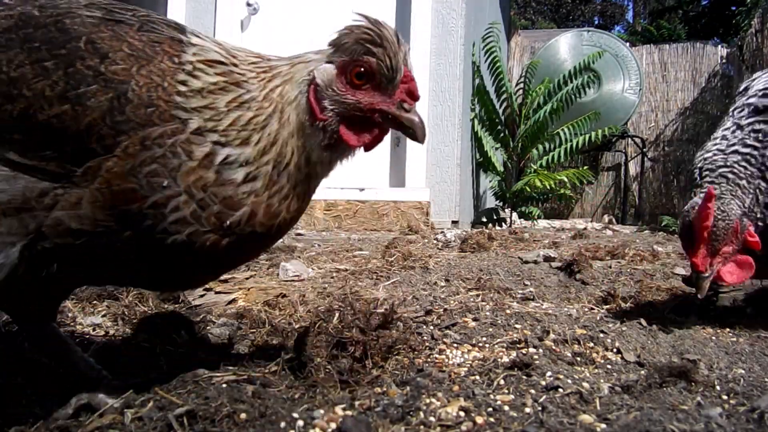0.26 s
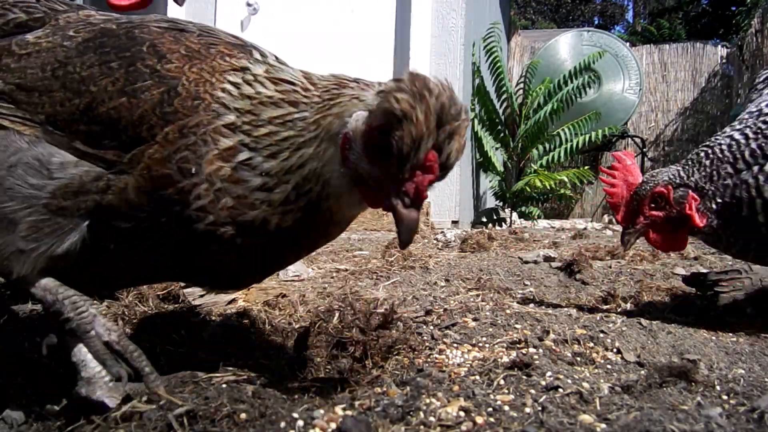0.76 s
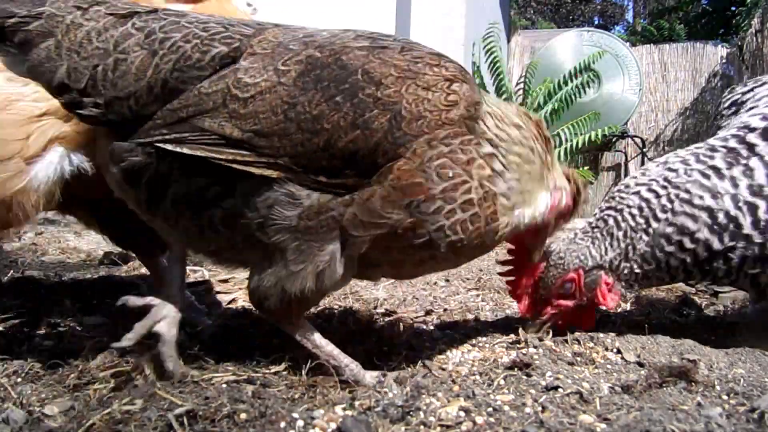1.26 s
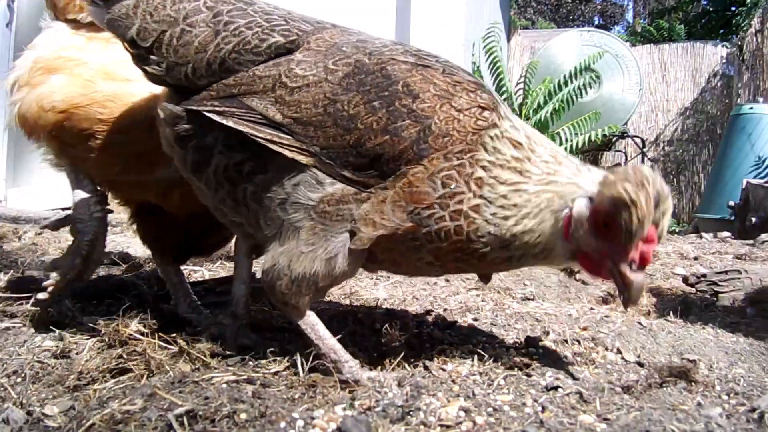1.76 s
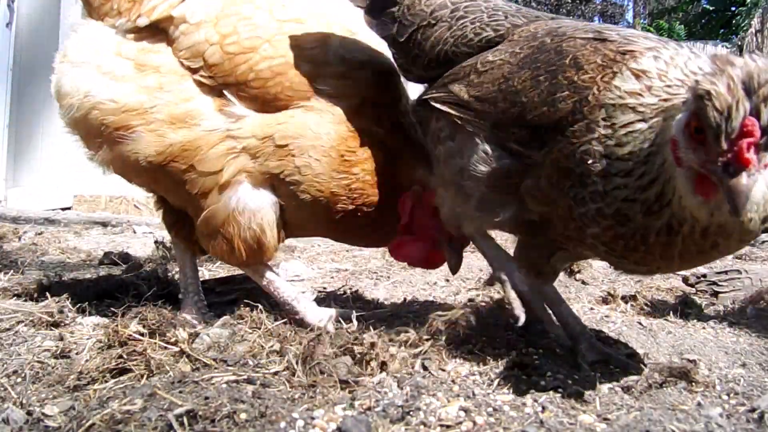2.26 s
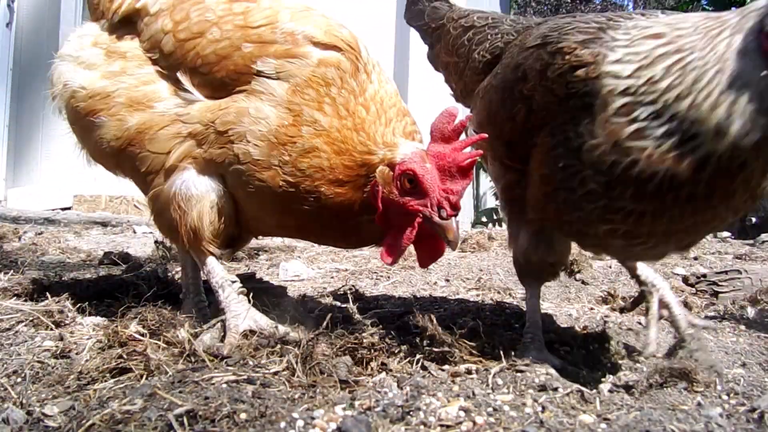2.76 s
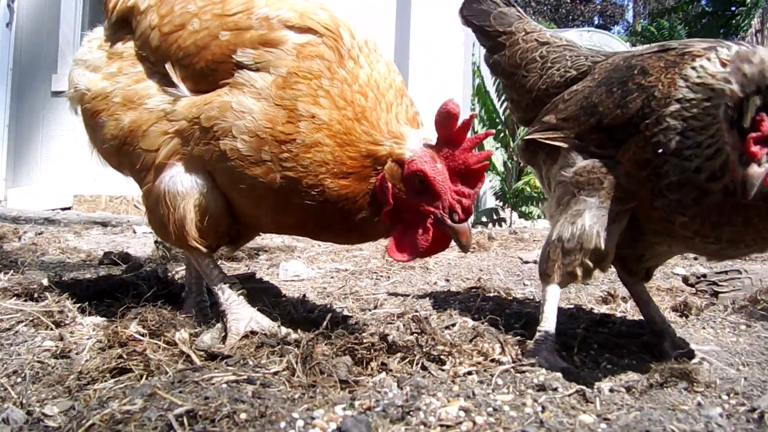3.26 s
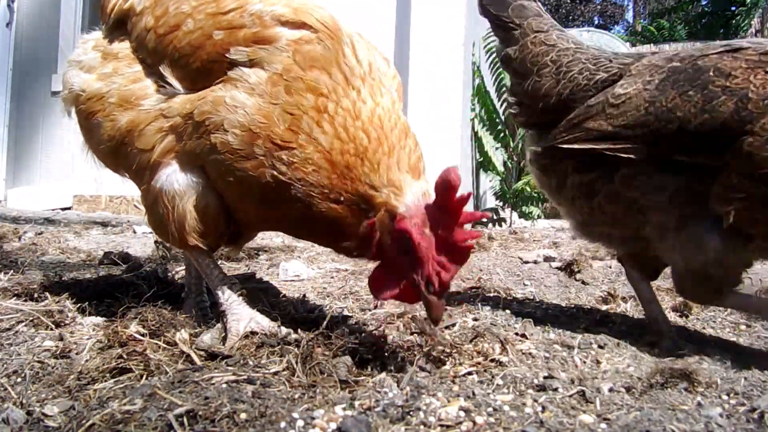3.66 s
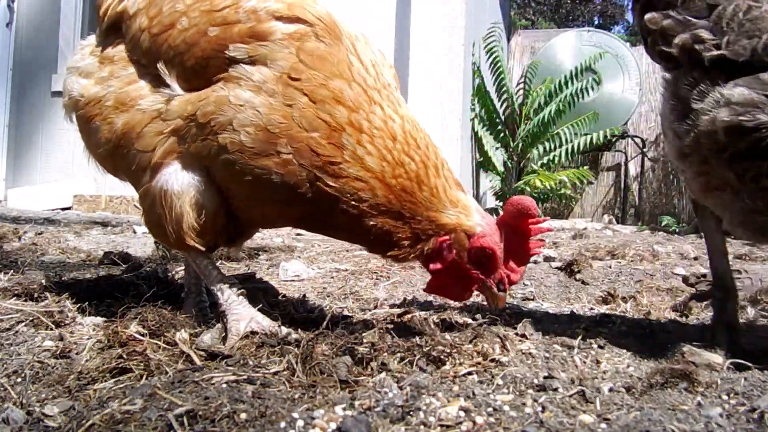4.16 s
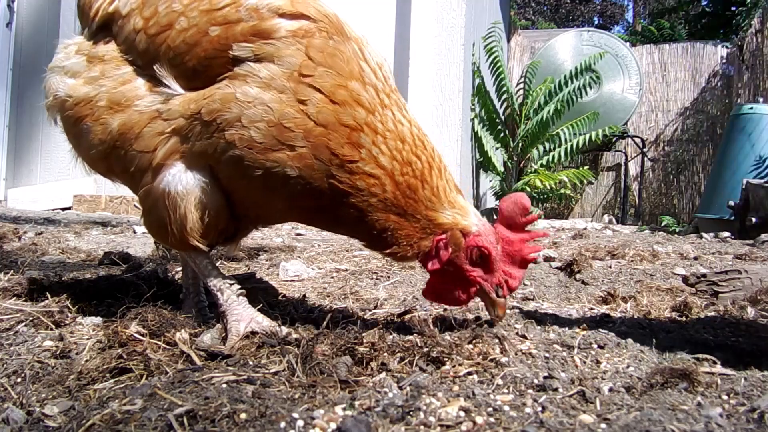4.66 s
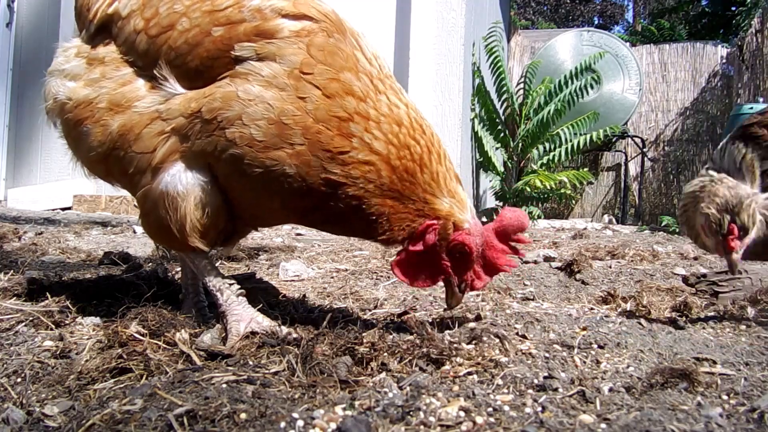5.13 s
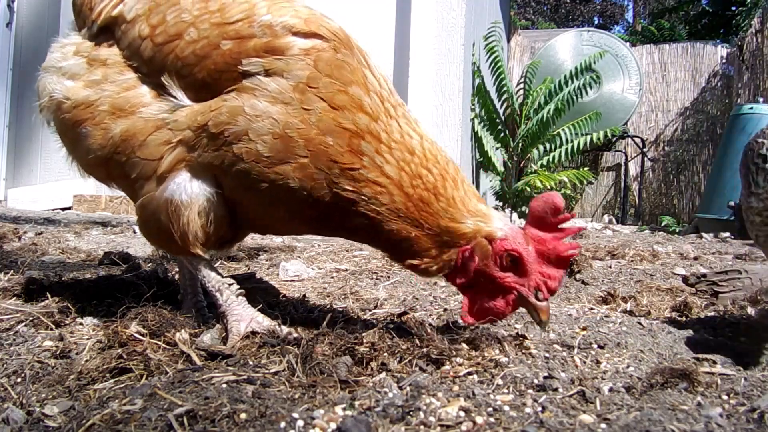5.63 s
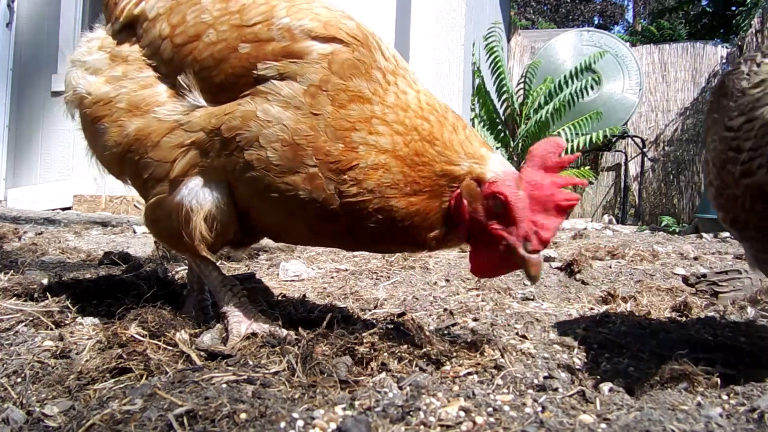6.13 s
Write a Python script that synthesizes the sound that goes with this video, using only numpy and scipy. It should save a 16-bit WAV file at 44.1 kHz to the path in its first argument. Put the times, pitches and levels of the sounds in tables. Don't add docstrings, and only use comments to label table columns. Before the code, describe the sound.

Hens scratch and peck seed from dry dirt with sharp ticks and knocks, give short clucks and one brief squawk, then murmur softly.

```python
import sys
import numpy as np
from scipy import signal
from scipy.fft import rfft, irfft
from scipy.io import wavfile

SR = 44100
rng = np.random.default_rng(int(sys.argv[2]) if len(sys.argv) > 2 else 0)


def voltage_ratio(level):
    return 10 ** (np.asarray(level, float) / 20)


def bounce(signal):
    frames = np.transpose(np.atleast_2d(signal))
    limited = np.clip(frames, -1, 1)
    pcm = np.round(limited * 32767).astype(np.int16)
    wavfile.write(sys.argv[1], SR, pcm)


N = 281799
T = np.arange(N) / SR

# (frequency [Hz], density [dB per Hz])
YARD_SPECTRUM = [(25, -102), (60, -95), (150, -83.5), (600, -85.5), (1150, -85), (1600, -85), (2200, -93),
                 (3000, -97), (4300, -99), (6000, -103), (9000, -112), (16000, -125)]
# (frequency [Hz], level [dB], wander [dB])
HUM_TONES = [(73, -76, 4.5), (118.4, -64.5, 5)]
# (time [s], rustle level [dB], fine dry part re rustle [dB])
RUSTLE_TRACK = [(0.0, -62, 10), (0.12, -65, 7), (0.19, -46.5, -8), (0.32, -61, -3), (0.6, -78, -5),
                (0.67, -53, -13), (0.76, -74, -5), (0.8, -50.5, 2), (0.93, -69, 11), (1.12, -54, 7),
                (1.14, -41, -1), (1.19, -53, 8), (1.24, -48, -1), (1.26, -65, 13), (1.33, -44, -4),
                (1.42, -59, 7), (1.46, -49, -7), (1.47, -51, -1), (1.65, -47.5, 0), (1.78, -58, 4),
                (2.13, -51.5, -20), (2.21, -58, -4), (2.22, -46, 5), (2.31, -56, -8), (2.35, -47, -30),
                (2.4, -53, -17), (2.47, -73, -9), (2.51, -29, -29), (2.53, -61, -11), (2.58, -70.5, -12),
                (2.7, -49.5, -5), (2.9, -48, -4), (3.13, -58.5, -9), (3.24, -56, -33), (3.44, -80, -12),
                (3.7, -66, -21), (4.61, -81, -17), (4.64, -61, -11), (4.66, -79, -9), (4.86, -71.5, -19.5),
                (6.39, -62.5, -1)]
# (time [s], peak [dB], centre [Hz])
STRAW_SNAPS = [(0.141, -54, 5980), (0.19, -44, 5400), (0.2109, -49, 9770), (0.3476, -45, 6290),
               (0.4168, -51, 5900), (0.5806, -50, 5780), (0.789, -52, 9700), (0.8545, -48, 5570),
               (0.9564, -45, 9700), (1.1066, -45, 5700), (1.233, -43, 5580), (1.335, -48, 6220),
               (1.4513, -37, 5500), (1.5229, -54, 5910), (1.5755, -37.5, 5800), (1.6262, -48, 5570),
               (1.6521, -51, 5810), (1.729, -46.5, 5600), (1.8203, -56, 5600), (1.9732, -47, 5740),
               (2.2258, -41, 5500), (2.495, -52, 5700), (2.709, -52, 9500), (2.7805, -48, 5730),
               (3.8596, -53, 5640), (4.6399, -47, 5770), (5.444, -54, 5720)]
# (time [s], peak [dB], ring [Hz], t60 [s])
BEAK_KNOCKS = [(0.185, -45, 1460, 0.015), (0.215, -44.5, 1160, 0.015), (0.264, -48, 813, 0.015),
               (0.64, -42.5, 970, 0.015), (0.72, -44, 1590, 0.012), (0.857, -45.5, 945, 0.015),
               (1.245, -48, 890, 0.017), (1.549, -48, 729, 0.015), (1.626, -36.5, 1910, 0.011),
               (1.702, -38, 830, 0.018), (1.821, -45, 1550, 0.022), (1.903, -38, 900, 0.017),
               (2.226, -44, 1680, 0.014), (2.546, -40, 1010, 0.012), (3.158, -42.5, 940, 0.012),
               (4.451, -34.5, 805, 0.016), (4.64, -29.5, 1500, 0.011), (4.819, -44, 1430, 0.015),
               (4.865, -38, 700, 0.017), (5.591, -42, 1470, 0.017), (5.95, -45, 1130, 0.017),
               (5.977, -40, 1300, 0.019)]
# (time [s], peak [dB], ring [Hz], t60 [s])
SEED_TICKS = [(0.186, -39, 4100, 0.014), (0.19, -39, 4300, 0.011), (0.217, -28.5, 3680, 0.0094),
              (0.2564, -48, 4380, 0.015), (0.2648, -43, 4300, 0.013), (0.3546, -44.5, 4130, 0.015),
              (0.3995, -49, 4200, 0.015), (0.5801, -53, 4010, 0.015), (0.64, -43, 4170, 0.015),
              (0.6653, -41, 4000, 0.017), (0.7193, -44, 3860, 0.015), (0.7915, -32.5, 4160, 0.022),
              (0.8255, -40, 4160, 0.017), (0.832, -40, 4040, 0.019), (0.855, -45, 4230, 0.015),
              (0.8774, -50, 4300, 0.015), (0.9592, -54, 4440, 0.015), (1.1034, -49, 4120, 0.015),
              (1.1333, -44, 4310, 0.015), (1.2343, -25, 4160, 0.021), (1.286, -52, 4170, 0.015),
              (1.3089, -50, 4280, 0.015), (1.4514, -21, 3990, 0.008), (1.476, -43, 3230, 0.015),
              (1.5459, -42, 4200, 0.018), (1.5765, -33.5, 4310, 0.011), (1.6274, -42, 4250, 0.015),
              (1.6526, -41, 3900, 0.015), (1.701, -40.5, 4390, 0.015), (1.8228, -49, 4100, 0.015),
              (1.8813, -44, 3510, 0.016), (1.9024, -57, 4470, 0.015), (1.9714, -53, 4070, 0.015),
              (2.227, -33.5, 4630, 0.015), (2.5466, -46, 4190, 0.015), (2.7082, -46, 3920, 0.015),
              (2.781, -49, 4370, 0.015), (2.8689, -52, 4280, 0.016), (3.0115, -43, 4000, 0.015),
              (3.1575, -39, 3800, 0.013), (3.1674, -46, 4190, 0.014), (3.386, -49.5, 4230, 0.015),
              (3.782, -46, 4050, 0.015), (3.8576, -46, 3800, 0.015), (3.927, -49, 4350, 0.013),
              (4.3799, -55, 4430, 0.015), (4.4416, -43, 4140, 0.015), (4.4514, -52, 4270, 0.015),
              (4.6254, -51, 4260, 0.015), (4.6399, -33, 4050, 0.0083), (4.8184, -41.5, 4150, 0.015),
              (4.864, -43.5, 4060, 0.014), (5.1916, -48, 3140, 0.015), (5.4435, -48, 2960, 0.015),
              (5.5907, -39, 4300, 0.012), (5.6745, -49, 3270, 0.015), (5.7508, -48.5, 4290, 0.015),
              (5.9499, -46, 4350, 0.015), (5.975, -40.5, 3080, 0.015), (6.1629, -46, 4400, 0.014)]
# (time [s], pitch [Hz], level [dB])
SPARROW_NOTES = [
    [(1.98, 3200, -66), (2.0, 3130, -60), (2.025, 3130, -62)],
    [(2.025, 3510, -66), (2.042, 3800, -58), (2.056, 3500, -53), (2.068, 3280, -56), (2.095, 3200, -62)],
    [(3.204, 3200, -54), (3.21, 3700, -49), (3.217, 4390, -54), (3.238, 4450, -51), (3.252, 4230, -60),
     (3.266, 4100, -63)],
    [(3.238, 3480, -60), (3.243, 3230, -49), (3.25, 3650, -42.5), (3.258, 3700, -59)],
    [(3.258, 2910, -58), (3.275, 3100, -54), (3.287, 3484, -38.5), (3.294, 2830, -54), (3.31, 2700, -61),
     (3.337, 2800, -65)],
    [(3.272, 4220, -64), (3.28, 4250, -54), (3.292, 4220, -64)],
]
# (time [s], peak [dB], throat [Hz], sharp edge re peak [dB])
THROAT_POPS = [(2.0962, -26, 864, -35), (2.3353, -35, 700, -40), (2.3396, -22, 740, -20),
               (2.3453, -26, 730, -7.5), (2.4923, -25, 845, -43), (2.4962, -21, 800, -14.5),
               (2.733, -34, 1430, -21), (2.7367, -23, 820, -38), (2.7398, -18, 786, -41),
               (3.7202, -27, 1000, -40), (3.7239, -26, 970, -33), (4.1282, -34, 890, -34),
               (4.1322, -27, 960, -35)]
# (time [s], pitch [Hz], first partial [dB], second partial [dB])
CLUCK_TRACKS = [
    [(2.1, 745, -41.5, -55), (2.144, 727, -32.5, -40), (2.17, 710, -51, -75)],
    [(2.348, 656, -37, -39), (2.388, 684, -30, -48), (2.41, 687, -51, -69)],
    [(2.499, 636, -33, -28.5), (2.515, 708, -23.5, -50.5), (2.532, 637, -60, -79)],
    [(2.744, 577, -42, -47), (2.758, 570, -36, -41), (2.778, 577, -60, -68)],
    [(3.727, 628, -50, -45), (3.743, 732, -37.5, -50.5), (3.793, 665, -41, -46.5), (3.824, 670, -54, -70)],
    [(3.96, 795, -47.5, -54), (3.976, 718, -33, -43.5), (4.04, 687, -47, -66)],
    [(4.13, 654, -48, -31), (4.144, 627, -36.5, -48), (4.163, 740, -63, -51)],
]
# (time [s], pitch [Hz], level [dB], throat [Hz], fall above throat [dB per octave])
SQUAWK_TRACKS = [
    [(2.799, 322, -34.5, 820, -7), (2.815, 280.6, -18, 870, -5), (2.88, 252, -32, 820, -13.5)],
    [(2.88, 231, -29, 820, -7), (2.948, 225, -23, 856, -14), (2.966, 204, -36.5, 830, -9),
     (2.978, 198, -46, 820, -7)],
]
# (time [s], pitch [Hz], first partial [dB], second partial [dB])
MURMUR_TRACKS = [
    [(4.08, 390.4, -73, -63), (4.104, 348.5, -55, -51.5), (4.186, 354.7, -68, -57.5),
     (4.23, 340.4, -61.5, -60.5), (4.33, 338, -61, -53)],
    [(4.33, 402.5, -56, -56), (4.402, 341, -69, -62.5), (4.518, 393.6, -52.5, -50), (4.544, 321, -60, -52),
     (4.57, 362.6, -74, -88)],
    [(4.6, 314.5, -59.5, -60), (4.746, 345, -51, -47), (4.772, 389, -49.5, -61), (4.794, 329, -49, -42),
     (4.82, 340, -63, -65)],
    [(4.835, 339, -64, -66), (4.865, 325, -45, -48), (4.905, 325, -60, -60)],
    [(4.945, 330, -66, -69), (4.981, 314.6, -49.5, -53), (5.015, 278, -59, -49)],
    [(5.04, 365, -69, -69), (5.076, 342, -40, -41), (5.115, 331, -64, -63)],
]
# (frequency [Hz], density [dB per Hz])
HISS_SPECTRUM = [(100, -100), (1000, -100), (3000, -106), (7000, -112), (9000, -105), (16000, -101)]
# (frequency [Hz], width [Hz])
CASE_NOTCHES = [(2500, 300), (5020, 1110), (7500, 910)]


def rms_one(x):
    return x / np.sqrt(np.mean(x ** 2) + 1e-20)


def span(rows):
    s, *columns = np.transpose(rows)
    part = slice(int(s[0] * SR), int(s[-1] * SR))
    t = T[part]
    fade = np.clip(np.minimum(t - s[0], s[-1] - t) / 0.0013, 0, 1)
    return part, [np.interp(t, s, c) for c in columns], fade


def drift(rate_hz):
    r = np.exp(-80 * np.pi * rate_hz / SR)
    noise = rng.standard_normal(N // 40 + 2002)
    slow = signal.lfilter([1], [1, -2 * r, r * r], noise)[2000:]
    return np.interp(np.arange(N) / 40, np.arange(len(slow)), rms_one(slow))


def coloured(spectrum, count):
    hz = np.maximum(np.fft.rfftfreq(N, 1 / SR), 1)
    points_hz, points_db = np.transpose(spectrum)
    density_db = np.interp(np.log(hz), np.log(points_hz), points_db)
    gain = voltage_ratio(density_db) * np.sqrt(SR / 2)
    return irfft(rfft(rng.standard_normal((count, N))) * gain, N)


def add_ring(out, s, db, hz, t60):
    t = np.arange(int(np.clip(t60, 0.001, 0.2) * SR)) / SR
    ring = -voltage_ratio(db - 60 * t / t60) * np.sin(2 * np.pi * hz * t)
    at = int(s * SR)
    out[at:at + len(t)] += ring[:N - at]


def peak(x, hz, width_hz):
    r = np.exp(-np.pi * width_hz / SR)
    poles = [1, -2 * r * np.cos(2 * np.pi * hz / SR), r * r]
    return signal.lfilter([(1 - r * r) / 2, 0, (r * r - 1) / 2], poles, x)


def yard(alike, gust_db):
    shared, left, right = coloured(YARD_SPECTRUM, count=3)
    own = np.array([left, right])
    air = np.sqrt(alike) * shared + np.sqrt(1 - alike) * own
    return air * voltage_ratio(gust_db * drift(3))


def hum():
    out = np.zeros(N)
    for hz, db, wander_db in HUM_TONES:
        level = voltage_ratio(db + wander_db * drift(4.2))
        out += np.sqrt(2) * level * np.sin(2 * np.pi * hz * T)
    return out


def rustle():
    part, (level_db, fine_db), _ = span(RUSTLE_TRACK)
    sizes = voltage_ratio(3.4 * np.minimum(rng.exponential(1, N), 5)) * rng.choice([-1, 1], N)
    grains_per_s = 2500 * voltage_ratio(5 * drift(25))
    grains = sizes * (rng.random(N) < grains_per_s / SR) + 1e-18
    dealt = rng.integers(0, 16, N)
    rings = []
    for k, hz in enumerate(np.geomspace(1500, 11000, 16)):
        rings.append(peak(grains * (dealt == k), hz, hz / 5.8))
    coarse = rms_one(sum(rings[:10]))[part]
    fine = rms_one(sum(rings[10:]))[part]
    out = np.zeros(N)
    out[part] = voltage_ratio(level_db - 4.5) * (coarse + voltage_ratio(fine_db - 8.5) * fine)
    return out


def straw_snaps():
    out = np.zeros(N)
    for s, db, hz in STRAW_SNAPS:
        add_ring(out, s, db + 12.5, hz, t60=0.003)
    return out


def beak_knocks():
    out = np.zeros(N)
    for s, db, hz, t60 in BEAK_KNOCKS:
        add_ring(out, s, db + 5.5, hz, t60)
        add_ring(out, s, db - 2, hz * 1.67, t60 * 0.73)
    return out


def seed_ticks():
    out = np.zeros(N)
    chances = rng.random((len(SEED_TICKS), 2))
    for (s, db, hz, t60), (wait, detune) in zip(SEED_TICKS, chances):
        add_ring(out, s, db - 1.5, hz, t60)
        rebound_s = s + 0.00099 + 0.0052 * wait
        add_ring(out, rebound_s, db - 5, hz * (0.77 + 0.3 * detune), t60=0.005)
    return out


def sparrow():
    out = np.zeros(N)
    for rows in SPARROW_NOTES:
        part, (hz, level_db), fade = span(rows)
        turn = 2 * np.pi * np.cumsum(hz) / SR
        out[part] += np.sqrt(2) * voltage_ratio(level_db) * fade * np.sin(turn)
    t = np.arange(int(0.12 * SR)) / SR
    decay = rng.standard_normal(len(t)) * voltage_ratio(-60 * t / 0.24)
    echoes = rms_one(decay) / np.sqrt(len(t))
    return out + voltage_ratio(-3) * signal.fftconvolve(out, echoes)[:N]


def throat_pops():
    out = np.zeros(N)
    for s, db, throat_hz, edge_db in THROAT_POPS:
        add_ring(out, s, db, throat_hz, t60=0.014)
        add_ring(out, s, db + edge_db + 13, 3800, t60=0.0025)
    return out


def syrinx(tracks, jitter, shimmer_db, step_db, skew_rad):
    out, wobble, flutter = np.zeros(N), drift(60), drift(57)
    for rows in tracks:
        part, (hz, first_db, second_db), fade = span(rows)
        turn = 2 * np.pi * np.cumsum(hz * (1 + jitter * wobble[part])) / SR
        tone = voltage_ratio(first_db) * np.cos(turn)
        for k in range(2, 7):
            partial_db = second_db + step_db * np.log2(k - 1)
            tone = tone + voltage_ratio(partial_db) * np.cos(k * turn + skew_rad * (k - 1))
        out[part] -= np.sqrt(2) * tone * fade * voltage_ratio(shimmer_db * flutter[part])
    return out


def clucks():
    return syrinx(CLUCK_TRACKS, jitter=0.0082, shimmer_db=4.0, step_db=-18, skew_rad=0.86)


def squawk(width_hz, jitter, shimmer_db):
    onset, hold = SQUAWK_TRACKS
    part, (hz, level_db, throat_hz, fall_db), fade = span(onset + hold[1:])
    turn = 2 * np.pi * np.cumsum(hz * (1 + jitter * drift(61)[part])) / SR
    k = np.arange(1, 22)[:, None]
    ratio = k * hz / throat_hz
    resonance = 1 / (1 - ratio ** 2 + 1j * ratio * width_hz / throat_hz)
    throat = voltage_ratio(fall_db * np.log2(1 + ratio ** 4) / 4) * resonance
    pulses = np.real(throat * np.exp(1j * k * turn)).sum(axis=0)
    tone = pulses / np.sqrt((abs(throat) ** 2).sum(axis=0) / 2)
    out = np.zeros(N)
    out[part] = -tone * fade * voltage_ratio(level_db + shimmer_db * drift(48)[part])
    return out


def murmurs():
    return syrinx(MURMUR_TRACKS, jitter=0.018, shimmer_db=4.5, step_db=-15, skew_rad=-1.03)


def scene():
    voices = throat_pops() + clucks() + squawk(width_hz=245, jitter=0.01, shimmer_db=1.8) + murmurs()
    pecks = straw_snaps() + beak_knocks() + seed_ticks()
    near = voltage_ratio(4.0) * voices + pecks + sparrow()
    litter = np.array([rustle(), rustle()])
    hum_at_ports = hum() * voltage_ratio([[3], [0]])
    return near + litter + yard(alike=0.48, gust_db=0.72) + hum_at_ports


def top_cut(x):
    return signal.sosfilt(signal.butter(12, 16530, fs=SR, output="sos"), x)


def record(dry):
    shade_db, shade_hz = -6, 2360
    port_hz, port_width_hz, port_db = 4280, 506, 8.5
    r = np.exp(-2 * np.pi * shade_hz / SR)
    left = voltage_ratio(shade_db) * signal.lfilter([1 - r], [1, -r], dry[0])
    left = left + voltage_ratio(-24) * peak(left, 3600, 504)
    right = dry[1] + (voltage_ratio(port_db) - 1) * peak(dry[1], port_hz, port_width_hz)
    hiss = coloured(HISS_SPECTRUM, count=2) * voltage_ratio([[-1.5], [0]])
    mix = np.array([left, right]) + hiss
    for hz, width_hz in CASE_NOTCHES:
        mix = mix - peak(mix, hz, width_hz)
    return top_cut(mix)


dry = scene()
out = record(dry)
bounce(out)
```